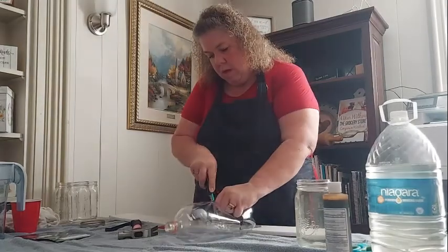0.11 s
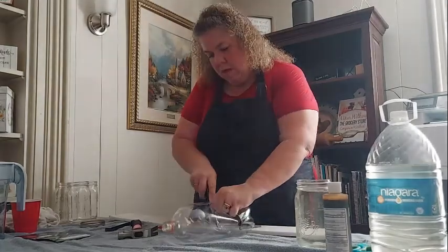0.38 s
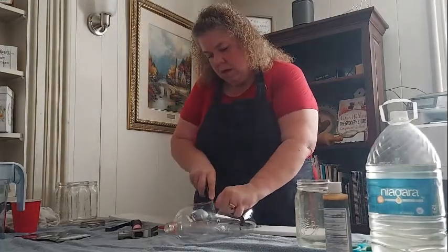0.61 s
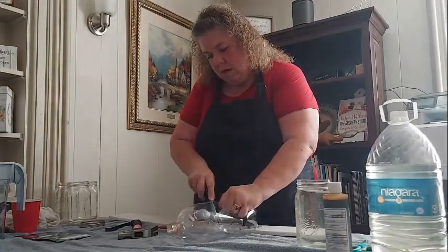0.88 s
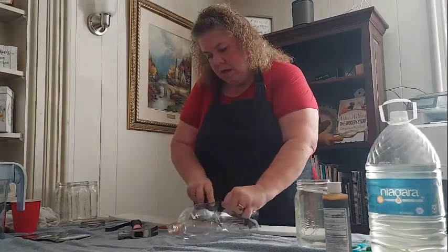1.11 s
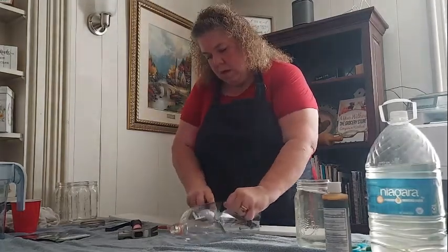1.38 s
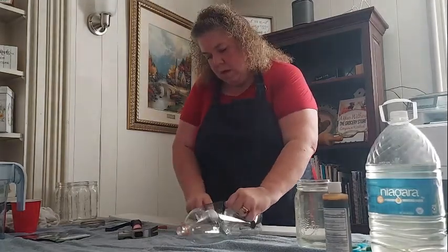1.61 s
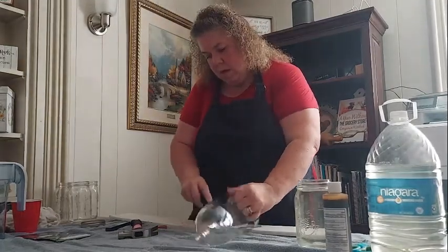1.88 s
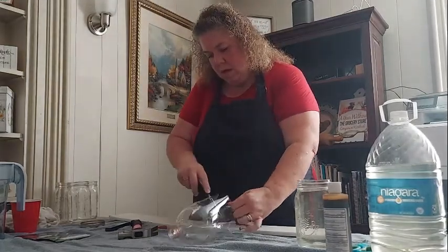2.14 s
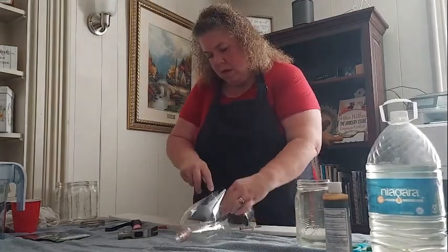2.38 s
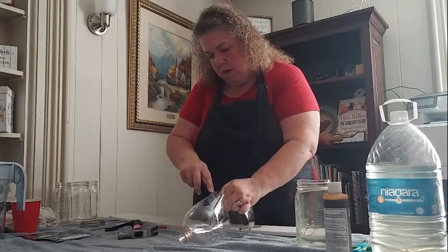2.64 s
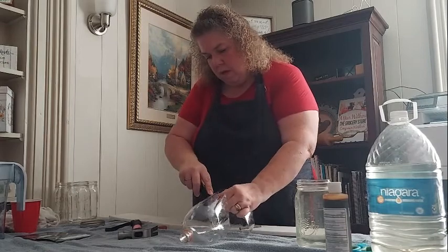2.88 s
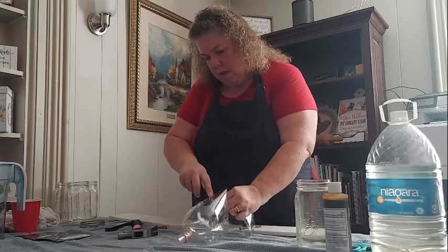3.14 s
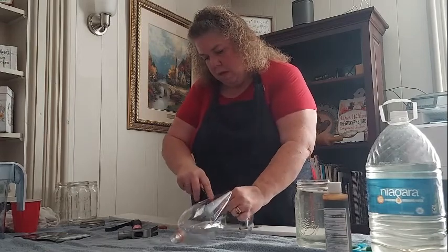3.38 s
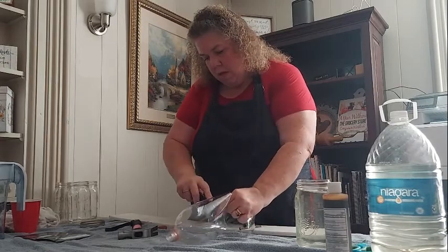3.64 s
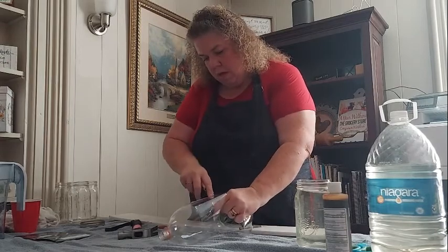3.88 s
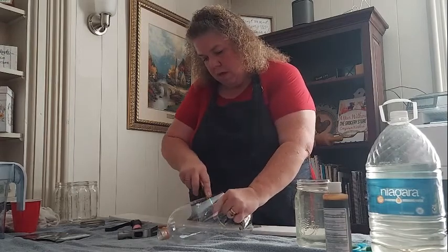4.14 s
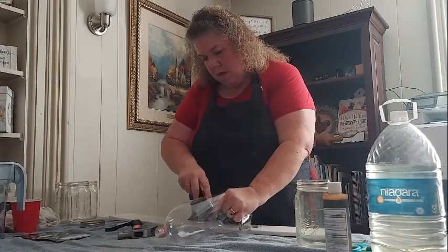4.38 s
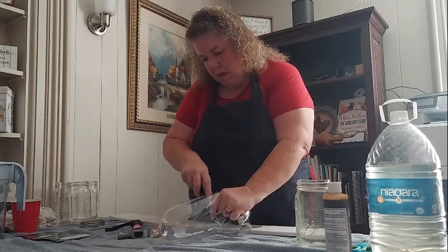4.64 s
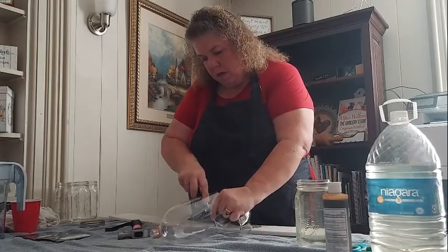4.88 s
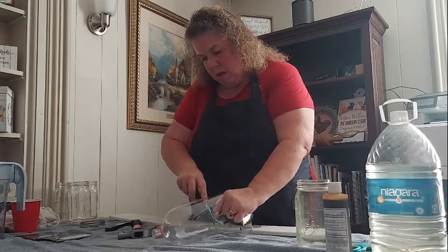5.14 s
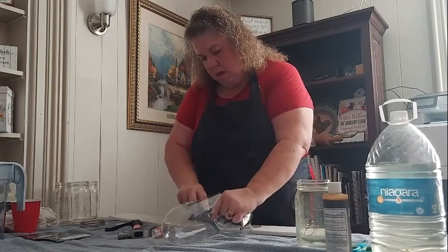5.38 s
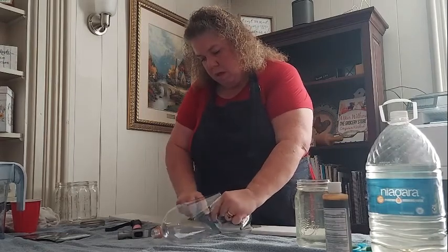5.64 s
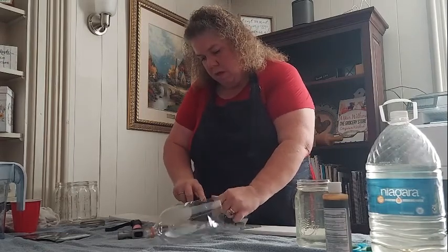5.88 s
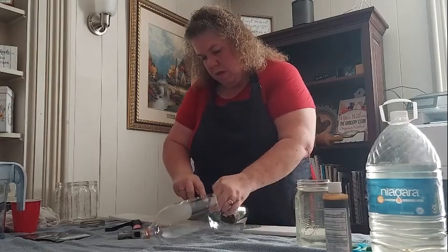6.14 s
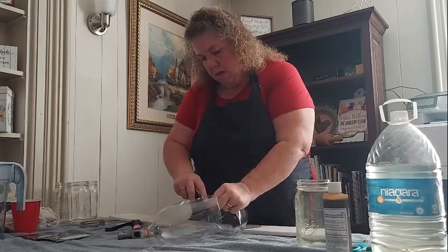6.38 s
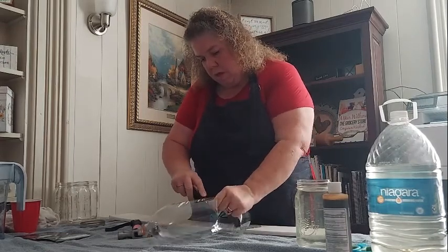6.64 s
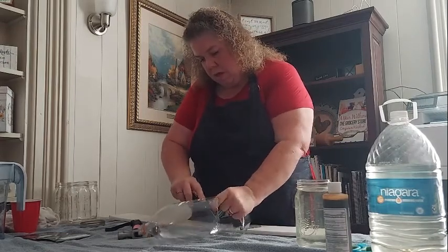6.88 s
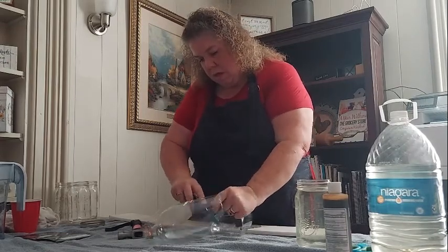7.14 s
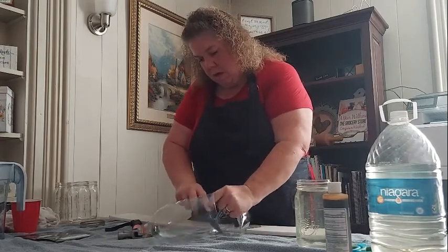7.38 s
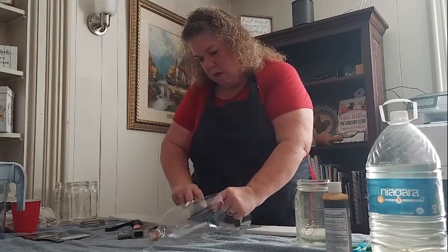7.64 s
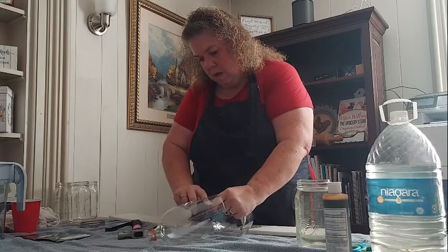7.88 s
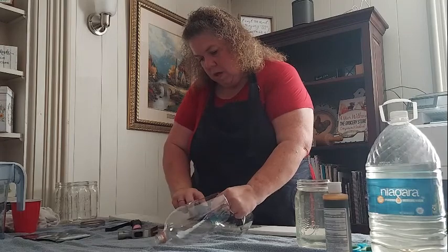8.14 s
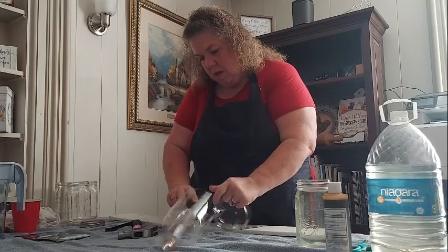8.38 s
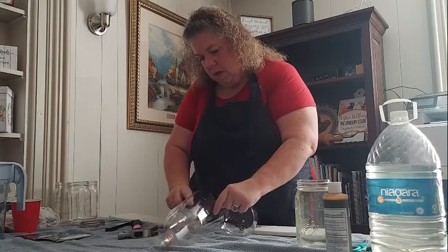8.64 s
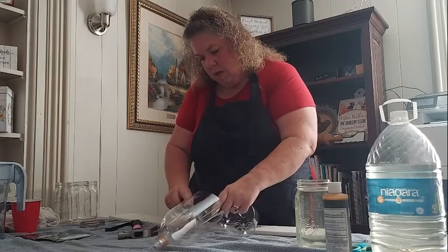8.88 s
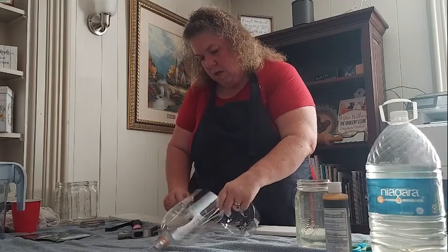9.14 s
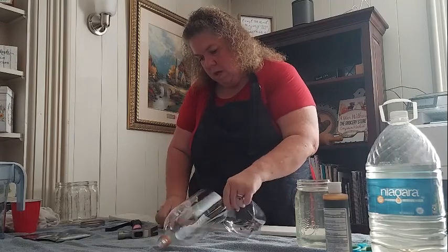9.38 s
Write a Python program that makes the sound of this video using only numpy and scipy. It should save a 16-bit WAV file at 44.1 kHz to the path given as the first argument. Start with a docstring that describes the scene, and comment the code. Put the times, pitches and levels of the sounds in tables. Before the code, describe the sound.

Quick cutting strokes tear thin plastic, with hollow bottle knocks, sharp snaps, crinkling and brief squeaks over faint indoor hum.

```python
"""A knife saws around the wall of a thin plastic bottle on a cloth-covered table in a small room, for 9.5 s.
A hollow knock opens; quick strokes tear the wall in slips that ring the bottle while the blade rasps.
The wall snaps now and then, hardest near 1.3 s, and hard again just before 2 s and near 7.8 s; dents knock,
pushes thud the table, fingers crinkle loudest near 2.1 s, and filtered-noise squeaks come from 6 to 7 s.
The last strokes are faint, over the room tone and hum that run throughout."""
import sys
import numpy as np
from scipy import signal
from scipy.fft import rfft, irfft, next_fast_len
from scipy.io import wavfile
from scipy.ndimage import uniform_filter1d

SR = 44100
rng = np.random.default_rng(int(sys.argv[2]) if len(sys.argv) > 2 else 0)


def materialize(psi):
    """Save the field psi as 16-bit PCM at rate SR to the path in sys.argv[1].

    A 1-D psi becomes a single channel; in a 2-D psi each row is a channel.
    """
    bounded = np.clip(np.atleast_2d(psi).T, -1, 1)
    quanta = np.round(bounded * 32767).astype(np.int16)
    wavfile.write(sys.argv[1], SR, quanta)


def invert_db(x):
    """Field ratio 10**(x/20) for x, a level in decibels (scalar or array-like)."""
    u = np.asarray(x, float) / 20
    return 10 ** u


N = 419374

# strokes of the knife and squeezes of the hand, with relative levels:
# start_s, length_s, push_db, blade_contact_db, swell_db (rise from start to end)
STROKES = [(0.075, 0.243, -57.5, -93, -30.5), (0.354, 0.078, -38.5, -59.5, 3),
           (0.509, 0.082, -32.5, -48.5, 9.5), (0.667, 0.069, -33, -57.5, 0), (0.83, 0.065, -35, -61, 0.5),
           (0.992, 0.085, -35.5, -60.5, -1), (1.156, 0.038, -37.5, -57, 7), (1.288, 0.054, -37, -71, 3),
           (1.331, 0.038, -27, -46, 1.5), (1.46, 0.068, -39.5, -57.5, 1.5),
           (1.641, 0.042, -41.5, -69.5, 0.5), (1.816, 0.046, -51, -70, 6.5), (1.91, 0.073, -21, -60, 2.5),
           (2.035, 0.022, -35.5, -58, 8), (2.131, 0.062, -44.5, -97.5, 16), (2.233, 0.056, -44, -84, 27),
           (2.443, 0.035, -41.5, -86, -5.5), (2.565, 0.055, -43, -112, -9), (2.71, 0.066, -34, -90, -10.5),
           (2.898, 0.045, -43, -85.5, 0), (3.065, 0.036, -43, -79.5, 9.5), (3.181, 0.12, -42, -71, 12.5),
           (3.271, 0.073, -33.5, -53.5, -5), (3.412, 0.142, -49, -79, -21.5),
           (3.6, 0.089, -42.5, -69.5, -9.5), (3.99, 0.065, -39, -72, -20), (4.065, 0.057, -41, -63, -11),
           (4.168, 0.11, -46.5, -64, 6), (4.262, 0.12, -37, -52, -15.5), (4.508, 0.234, -52.5, -76, 14),
           (4.758, 0.044, -42.5, -58, -3), (4.937, 0.093, -33, -52.5, 10), (5.113, 0.096, -35, -51, 13.5),
           (5.288, 0.13, -34.5, -55.5, -0.5), (5.681, 0.091, -45, -62, -15), (5.806, 0.0896, -39, -60, 12),
           (5.986, 0.171, -41.5, -69, -15), (6.426, 0.14, -48, -84.5, -4), (6.639, 0.03, -33.5, -78, -7),
           (6.706, 0.11, -41, -66.5, -1), (6.983, 0.1, -34.5, -49.5, -1.5), (7.22, 0.06, -32, -51, 1),
           (7.41, 0.1105, -39.5, -56.5, -21), (7.798, 0.036, -34.5, -70.5, 7.5),
           (7.828, 0.097, -37, -52.5, -12.5), (7.975, 0.018, -39.5, -46.5, 4.5),
           (8.268, 0.071, -33, -54.5, -14), (8.397, 0.09, -41.5, -59.5, -5), (8.698, 0.18, -53.5, -79, -16),
           (8.898, 0.07, -39, -70.5, -22), (9.065, 0.065, -56, -80, -9), (9.347, 0.1, -71, -75, -12.5)]
# the wall buckles: start_s, crack_db, bright_edge_db (relative levels)
SNAPS = [(0.3777, -33, -41), (0.5006, -30, -34), (1.0046, -41, -46), (1.3297, -6, -40.5),
         (1.9231, -21.5, -60), (1.9609, -11.5, -22.5), (2.1728, -43, -67), (2.259, -39, -73),
         (2.2914, -32, -67), (2.4975, -41, -40.5), (2.6282, -46.5, -49), (2.772, -43.5, -58),
         (3.2889, -27.5, -32), (3.345, -26.5, -37.5), (3.5053, -49, -76), (3.6108, -52, -65),
         (3.6379, -33, -42.5), (4.224, -47, -50), (4.3406, -25.5, -33.5), (5.7002, -33, -38.5),
         (5.8228, -30, -35.5), (5.9751, -26, -68), (6.0126, -26.5, -64), (6.0761, -31, -37.5),
         (6.5008, -43.5, -77.5), (6.652, -45, -42), (6.7776, -37, -79), (7.2292, -44, -40.5),
         (7.4815, -24.5, -40.5), (7.84, -11.5, -19), (8.2793, -23.5, -42.5), (8.4136, -18.5, -40),
         (8.7125, -47.5, -53), (8.9052, -30, -55.5), (9.0887, -45.5, -59.5)]
# a dent pops or the loose lip of the cut flicks back, and the bottle knocks:
# start_s, level_db (relative), pitch_hz
KNOCKS = [(0.0, -22, 310), (0.316, -19.5, 265), (0.343, -16, 365), (0.39, -17, 258), (0.439, -16, 270),
          (0.689, -20, 262), (1.334, -10, 354), (1.9, -27.5, 345), (1.927, -7.5, 372), (1.962, -0.5, 364),
          (2.776, -28, 262), (3.134, -20, 391), (3.291, -15, 416), (3.346, -7, 297), (3.505, -23, 620),
          (4.008, -28, 387), (4.288, -17.5, 361), (4.342, -7, 386), (4.623, -31, 368), (5.314, -20, 400),
          (5.404, -14.5, 339), (5.711, -19.5, 408), (5.977, -16.5, 354), (6.019, -17.5, 387),
          (6.153, -34.5, 400), (6.462, -24.5, 409), (6.5, -22.5, 440), (6.656, -29.5, 483),
          (6.778, -23, 720), (7.233, -17, 734), (7.288, -20.5, 381), (7.483, -14.5, 345),
          (7.81, -24.5, 440), (8.292, -16.5, 358), (8.415, -19.5, 506), (8.568, -40, 750),
          (8.906, -22, 453), (9.267, -38.5, 635)]
# where the held bottle rings best: time_s, body_hz, wall_hz
GRIP = [(0, 271, 1160), (1.3, 321, 1860), (2.0, 379, 1850), (4.0, 366, 1880), (6.0, 410, 1520),
        (6.7, 480, 1550), (7.24, 400, 1310), (7.7, 399, 1370), (9.0, 455, 1490)]
# broad colour of tearing and cracks: pitch_hz, level_db (per Hz, relative)
WALL_COLOUR = [(400, -6), (800, -4.5), (1900, -8), (4500, -19), (9000, -31), (14000, -62)]
# bright colour of the blade and of snap edges: pitch_hz, level_db (per Hz, relative)
RASP_COLOUR = [(2350, -11.5), (4000, 5), (9890, 3), (16000, -4)]


def rms_one(x):
    """Scaled to rms 1."""
    return x / np.sqrt(np.mean(x ** 2) + 1e-20)


def in_time(rows):
    """Columns of a curve, one value a sample."""
    time_s, *columns = np.transpose(rows)
    return [np.interp(np.arange(N) / SR, time_s, column) for column in columns]


def at_hz(points, hz):
    """Value of a spectrum at hz, read along log frequency."""
    point_hz, value = np.transpose(points)
    return np.interp(np.log(np.maximum(hz, 1)), np.log(point_hz), value)


def drift(rate_hz):
    """Slow random wander with spread 1: noise at a 40th of the sample rate through two equal low-pass poles."""
    pole = np.exp(-2 * np.pi * rate_hz * 40 / SR)
    noise = rng.standard_normal(N // 40 + 2002)
    slow = signal.lfilter([1], [1, -2 * pole, pole * pole], noise)[2000:]   # skip the settling
    return np.interp(np.arange(N) / 40, np.arange(len(slow)), rms_one(slow))


def ring(clicks, hz, t60_s):
    """A unit click sets a sine of height 1 ringing in a two-pole resonator."""
    decay, turn = invert_db(-60 / (t60_s * SR)), 2 * np.pi * hz / SR
    poles = [1, -2 * decay * np.cos(turn), decay * decay]
    return signal.lfilter([0, np.sin(turn)], poles, clicks + 1e-18)


def wavering_ring(clicks, hz, t60_s, swell_s, waver):
    """Like ring, but the pitch wanders by the fraction waver, and the swing takes a moment to build."""
    turn = np.exp(2j * np.pi * np.cumsum(hz / SR * (1 + waver * drift(5.0))))
    decay, build = invert_db(-60 / (np.array([t60_s, swell_s]) * SR))
    poles = [1, -decay - build, decay * build]
    # the clicks are turned down to 0 Hz, given their envelope, then turned back up to pitch
    envelope = signal.lfilter([1 - build], poles, (clicks + 1e-18) / turn)
    return (turn * envelope).imag


def response(spectrum, size=4096):
    """Causal (minimum phase) impulse response of a spectrum, energy 1."""
    log_gain = at_hz(spectrum, np.fft.rfftfreq(size, 1 / SR)) * np.log(10) / 20
    fold = irfft(log_gain)   # cepstrum, folded onto positive time
    fold[1:size // 2] *= 2
    fold[size // 2 + 1:] = 0
    h = irfft(np.exp(rfft(fold)))
    return h / np.sqrt(np.sum(h ** 2))


def coloured(x, spectrum):
    """x through the response of a spectrum."""
    return signal.oaconvolve(x, response(spectrum))[:N]


def slips(per_s, spread_db):
    """Random slips of uneven size and either sign; rms 1."""
    sizes = invert_db(spread_db * np.minimum(rng.exponential(1, N), 4))
    signs = rng.choice([-1, 1], N)
    return rms_one(sizes * signs * (rng.random(N) < per_s / SR))


def clicks_at(rows, db):
    """One click for each row."""
    clicks = np.zeros(N)
    clicks[[round(row[0] * SR) for row in rows]] = invert_db(db)
    return clicks


def under_strokes(db, rise_s, fall_s):
    """Gain that follows each stroke: the blade bites, cuts with rising or falling force and lets go."""
    power = np.zeros(N)
    for (start_s, length_s, *_, swell_db), level_db in zip(STROKES, db):
        cut = slice(round(start_s * SR), round((start_s + length_s) * SR))
        power[cut] += invert_db(2 * level_db + swell_db * np.linspace(-1, 1, len(power[cut])))
    hold = np.exp(-1 / (fall_s * SR))   # fall_s is the time constant of the power
    gain = np.sqrt(signal.lfilter([1 - hold], [1, -hold], power))
    size = max(1, round(rise_s * SR))
    return uniform_filter1d(gain, size, origin=(size - 1) // 2)   # average of the past only


def near_centre(hz, centre_hz, db_per_octave):
    """The grip favours modes near a centre: level in dB, falling on both sides."""
    return -db_per_octave * np.abs(np.log2(hz / centre_hz))


def room_tone():
    """A faint noise floor of wavering level, shared by both ears in the bass, with a wavering appliance hum."""
    # floor colour: pitch_hz, level_db (per Hz, relative)
    floor_colour = [(30, -7.5), (88, -0.5), (173, -12), (455, -10), (1910, -41.5), (15500, -47)]
    mid, left, right = (coloured(rng.standard_normal(N), floor_colour) for _ in range(3))
    side = signal.lfilter(*signal.butter(1, 220, "high", fs=SR), left - right)
    floor = invert_db(-62.5 + drift(5.2)) * (mid + .5 * side * [[1], [-1]])
    hum = invert_db(-68) * rms_one(ring(rng.standard_normal(N), hz=122.5, t60_s=0.35))
    return floor + hum


def table_thud():
    """A push sets the low modes of the table top swinging; they take a few cycles to build."""
    # the hands push the bottle into the table: start_s, level_db (relative)
    pushes = [(1.023, -30), (1.336, -31), (4.336, -26), (5.405, -24), (5.729, -27.5), (7.478, -23.5),
              (7.632, -37.5), (9.359, -42.5)]
    # modes of the table top: pitch_hz, level_db (relative), t60_s
    table_modes = [(70.8, -23.5, 0.45), (124, -3, 0.28), (180, 1.5, 0.072)]
    push = clicks_at(pushes, np.array(pushes)[:, 1])
    out = 0
    for hz, level_db, t60_s in table_modes:
        out = out + invert_db(level_db) * wavering_ring(push, hz, t60_s, swell_s=5 / hz, waver=.029)
    return out


def handling():
    """Uneven crinkle under the fingers: random slips whose level follows a drawn curve and wavers."""
    # fingers shift on the bottle between strokes: time_s, level_db
    finger_curve = [(0, -66), (1.8, -71.5), (2.1, -51), (2.9, -68.5), (3.8, -79.5), (4.55, -65.5),
                    (5.6, -78), (6.1, -68), (6.3, -71), (6.6, -71.5), (7.7, -64), (8.15, -85.5), (8.6, -64),
                    (9.2, -72), (9.3, -66), (9.51, -72)]
    # colour of the crinkle: pitch_hz, level_db (per Hz, relative)
    rustle_colour = [(650, 1), (1100, -11), (2150, -18.5), (2700, -27.5), (6000, -22.5), (14000, -34)]
    level_db, = in_time(finger_curve)
    gain = invert_db(level_db + 4.0 * drift(10.0))
    return gain * coloured(slips(per_s=1500.0, spread_db=3.5), rustle_colour)


def squeaks():
    """Stick-slip on the smooth wall, made as noise through a narrow resonance, swelling and fading."""
    # the blade or a finger sticks and slips: start_s, length_s, pitch_hz, level_db (before the fades)
    squeak_rows = [(6.063, 0.039, 2280, -51), (6.339, 0.17, 1520, -70), (6.93, 0.083, 3120, -82.5),
                   (6.993, 0.068, 1960, -40.5)]
    out = np.zeros(N)
    for start_s, length_s, hz, level_db in squeak_rows:
        first, size = round(start_s * SR), round(length_s * SR)
        narrow = ring(rng.standard_normal(8000), hz, t60_s=.012)
        narrow = ring(narrow, hz, t60_s=.004)[-size:]
        out[first:first + size] = invert_db(level_db) * np.sqrt(np.hanning(size)) * rms_one(narrow)
    return out


def snaps():
    """A buckle is a sharp noise burst with a gritty tail: a crack in the wall with a bright edge."""
    _, crack_db, edge_db = np.transpose(SNAPS)
    t = np.arange(8000) / SR
    # three decays, each losing 60 dB in 6, 35 or 170 ms
    burst = invert_db(-60 * t / 0.006) + invert_db(-4.0 - 60 * t / 0.035) + invert_db(-19.0 - 60 * t / 0.17)
    burst /= np.sqrt(np.sum(burst ** 2))
    crack_noise, edge_noise = rng.standard_normal((2, N))
    crack = signal.oaconvolve(clicks_at(SNAPS, crack_db + 13.5), burst)[:N] * crack_noise
    tick = clicks_at(KNOCKS, np.array(KNOCKS)[:, 1] + 3.0)   # a popping dent ticks dully as it booms
    crack += signal.sosfilt(signal.butter(4, 900, fs=SR, output="sos"), tick)
    edge = signal.oaconvolve(clicks_at(SNAPS, edge_db + 14.0), burst)[:N] * edge_noise
    return coloured(crack, WALL_COLOUR) + coloured(edge, RASP_COLOUR)


def rasp():
    """The blade rubs the cut edge: dense, very uneven slips, a quick bite under a slower build."""
    blade_db = np.array(STROKES)[:, 3]
    build = under_strokes(blade_db, rise_s=0.041, fall_s=0.0013)
    bite = under_strokes(blade_db - 7.0, rise_s=0.003, fall_s=0.0078)
    gain = (build + bite) * invert_db(2.5 * drift(41.0) - 3.0)
    return gain * coloured(slips(per_s=5400.0, spread_db=9.0), RASP_COLOUR)


def panels(tear):
    """Tearing and snaps ring the short modes of the wall; which ones answer changes as the cut moves on."""
    # modes of the wall: pitch_hz, level_db (relative, for tearing)
    wall_modes = [(990, -7.5), (1370, 2.5), (1750, -9.5), (2120, 0), (2940, -11.5)]
    snapped = clicks_at(SNAPS, np.array(SNAPS)[:, 1])
    _, wall_hz = in_time(GRIP)
    out = 0
    for hz, level_db in wall_modes:
        tear_db = level_db - 37.5 + near_centre(hz, wall_hz, db_per_octave=16.0) + 7.4 * drift(11.0)
        push = tear * invert_db(tear_db)
        push = push + snapped * invert_db(near_centre(hz, wall_hz, db_per_octave=21.0))
        out = out + wavering_ring(push, hz, t60_s=.011, swell_s=2 / hz, waver=.04)
    return out


def tearing():
    """Dense slips of the parting wall with lone crackles among them, heard broad and through the wall's modes."""
    push_db, blade_db = np.array(STROKES)[:, 2:4].T
    # the wall tears harder the harder the push and the closer the blade
    tear_db = 8 + 0.86 * push_db + 0.32 * blade_db
    gain = under_strokes(tear_db, rise_s=0.0095, fall_s=0.014) * invert_db(1.9 * drift(14.0))
    dense = slips(per_s=4000.0, spread_db=3.0)
    crackles = slips(per_s=180.0, spread_db=4.5)
    tear = gain * (dense + invert_db(-1.5) * crackles)
    return invert_db(-8.0) * coloured(tear, WALL_COLOUR) + panels(tear)


def bottle():
    """Slips of the cut and popping dents ring the modes of the hollow body."""
    # modes of the body: pitch_hz, level_db (relative, for the slips)
    body_modes = [(228, -2), (262, 3.5), (310, -0.5), (354, 3.5), (400, 5), (465, 2), (508, -7.5),
                  (630, 8.5), (722, 7.5), (860, -2.5)]
    body_hz, _ = in_time(GRIP)
    drive = slips(per_s=600.0, spread_db=3.0) * invert_db(2 * drift(26.0))
    drive = drive * under_strokes(np.array(STROKES)[:, 2] - 24.0, rise_s=0.015, fall_s=0.01)
    knock_db, knock_hz = np.array(KNOCKS)[:, 1:].T
    out = 0
    for hz, level_db in body_modes:
        slip_db = level_db + near_centre(hz, body_hz, db_per_octave=15.5) + 3.56 * drift(8.0)
        mode_knock_db = knock_db + near_centre(hz, knock_hz, db_per_octave=45.0)
        push = drive * invert_db(slip_db) + clicks_at(KNOCKS, mode_knock_db)
        out = out + wavering_ring(push, hz, t60_s=25 / hz, swell_s=5 / hz, waver=.03)
    # a small body sends out no deep bass
    return signal.lfilter(*signal.butter(2, 150.0, "high", fs=SR), out)


def room(x):
    """Direct sound plus echoes that die by octave, other ones for each ear, all leaning left in the treble.
    The echoes waver: the sound drifts at random among three sets of echoes."""
    # decay of the echoes: pitch_hz, t60_s
    echo_decay = [(300, 0.19), (12000, 0.14)]
    # echoes against direct sound: pitch_hz, level_db
    echo_level = [(350, -15), (700, -0.5), (2000, 3.5), (12000, 3.5)]
    # left minus right: pitch_hz, level_db
    left_lean = [(950, 0), (15000, 4)]
    t, tails = np.arange(int(.5 * SR)) / SR, 0
    for low_hz in 44 * 2. ** np.arange(9):
        edges_hz, hz = [low_hz, min(2 * low_hz, .45 * SR)], low_hz * np.sqrt(2)
        octave = signal.butter(2, edges_hz, "band", fs=SR, output="sos")
        band = signal.sosfilt(octave, rng.standard_normal((3, 2, len(t))))   # sets, ears, time
        fade = invert_db(-60 * t / at_hz(echo_decay, hz)) * (t > .0015)   # echoes start after 1.5 ms
        tails = tails + band * fade * invert_db(at_hz(echo_level, hz)) / np.sqrt(np.sum(fade ** 2))
    size = next_fast_len(N + len(t))
    shares = np.array([drift(4.0) for _ in tails])
    shares /= np.sqrt(np.sum(shares ** 2, axis=0))   # total power stays even
    echoes = np.sum(rfft(x * shares, size)[:, None] * rfft(tails, size), axis=0)
    lean = invert_db(np.outer([.5, -.5], at_hz(left_lean, np.fft.rfftfreq(size, 1 / SR))))
    return irfft(lean * (rfft(x, size) + echoes), size)[:, :N]


def scene():
    """Everything on the table sounds in the room, over the room tone."""
    near = bottle() + tearing() + rasp() + snaps() + table_thud() + handling() + squeaks()
    return invert_db(-2.0) * room(near) + room_tone()


def band_limit(x):
    """A steep low-pass at the top of the band."""
    return signal.sosfilt(signal.butter(12, 15900, fs=SR, output="sos"), x)


def record(dry):
    """The microphone drops the deep bass below 58 Hz."""
    low_cut = signal.butter(4, 58.0, "high", fs=SR, output="sos")
    mix = signal.sosfilt(low_cut, dry)
    return band_limit(mix)


dry = scene()
out = record(dry)
materialize(out)
```